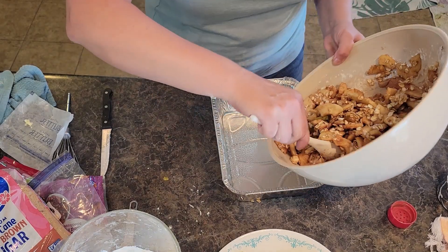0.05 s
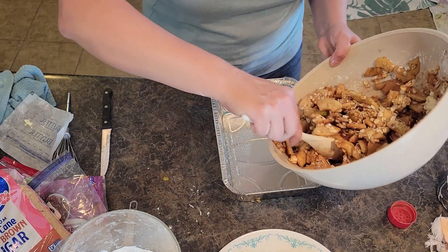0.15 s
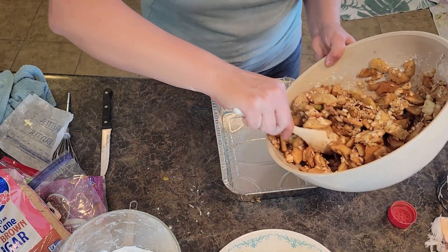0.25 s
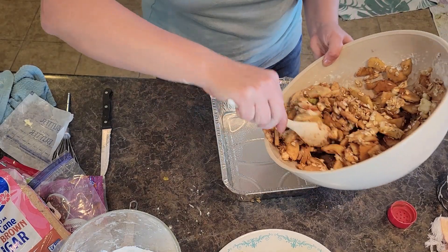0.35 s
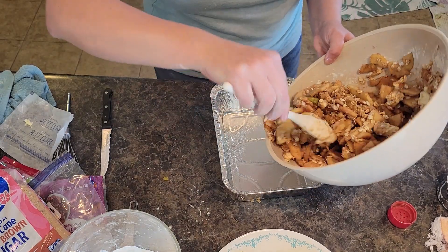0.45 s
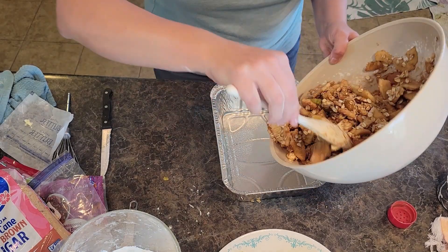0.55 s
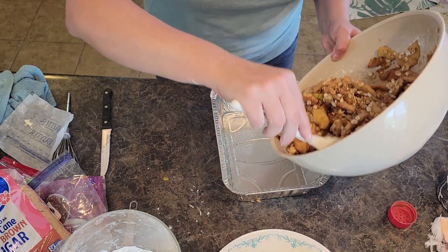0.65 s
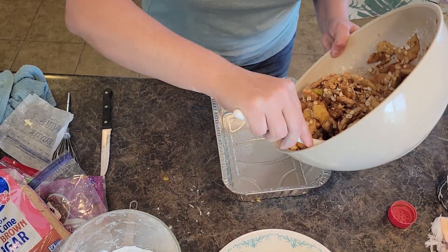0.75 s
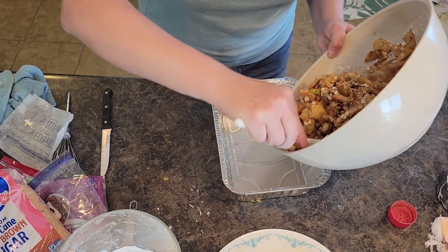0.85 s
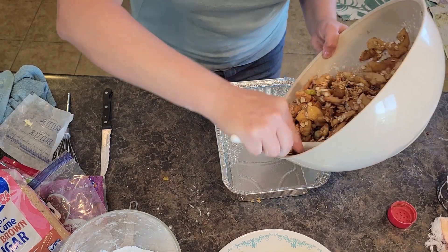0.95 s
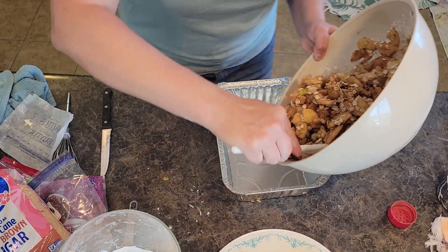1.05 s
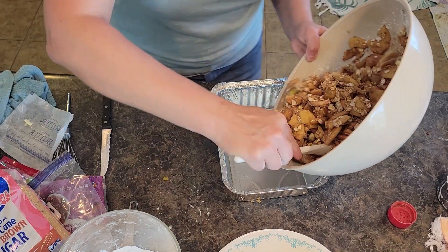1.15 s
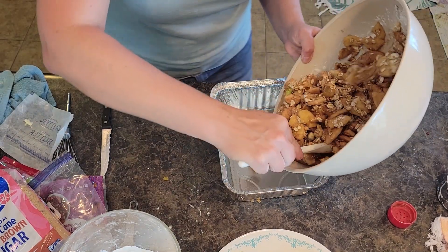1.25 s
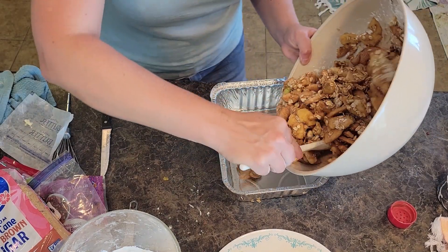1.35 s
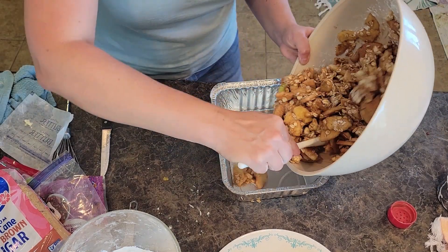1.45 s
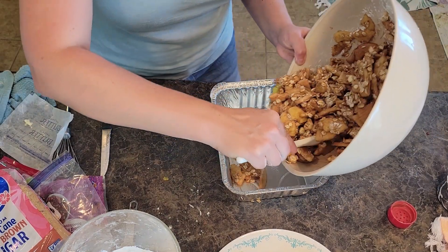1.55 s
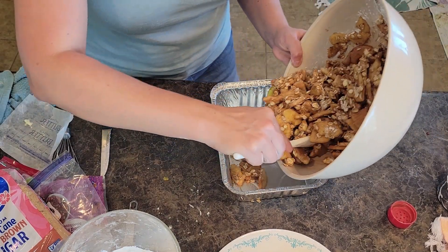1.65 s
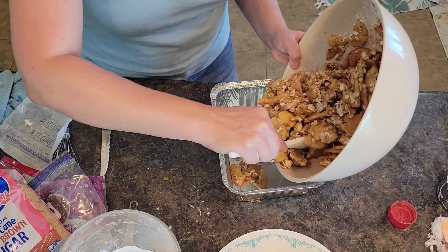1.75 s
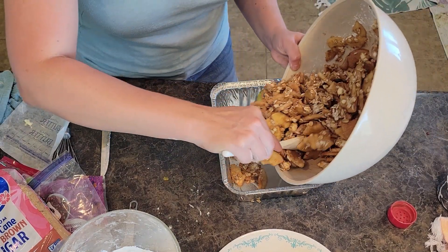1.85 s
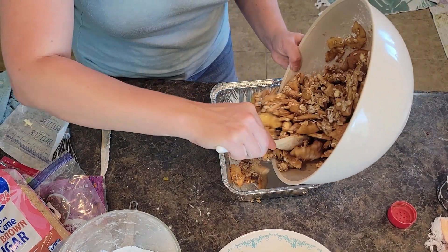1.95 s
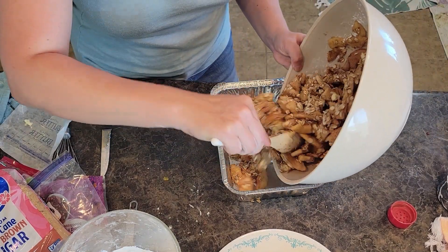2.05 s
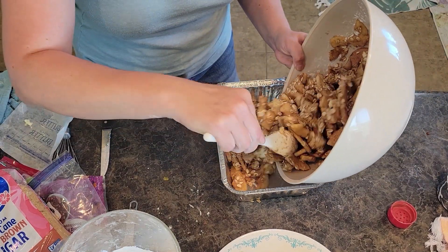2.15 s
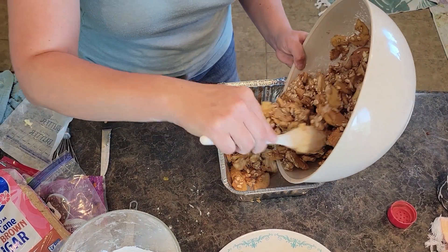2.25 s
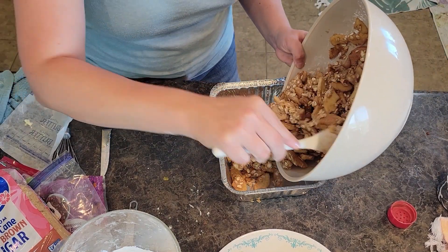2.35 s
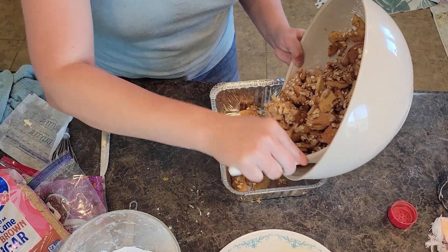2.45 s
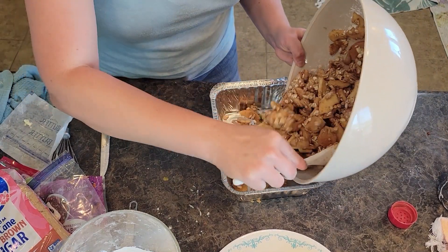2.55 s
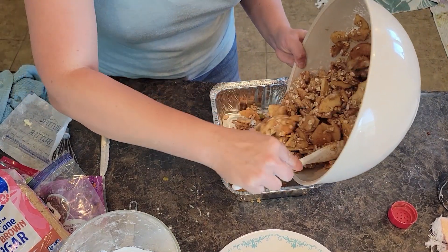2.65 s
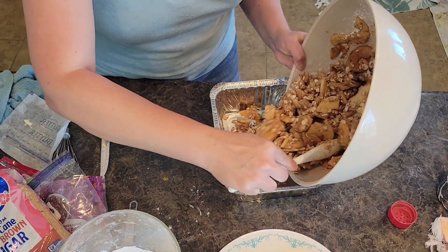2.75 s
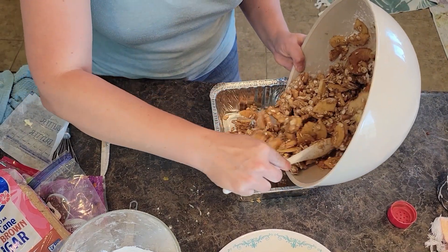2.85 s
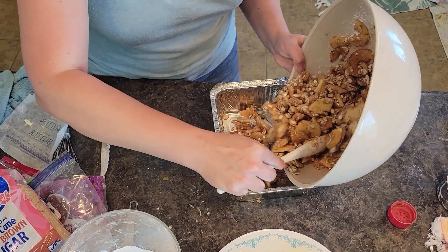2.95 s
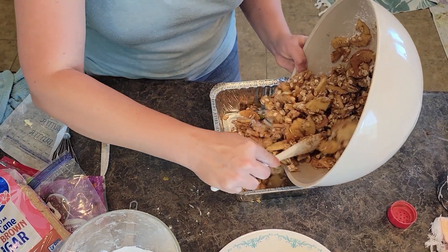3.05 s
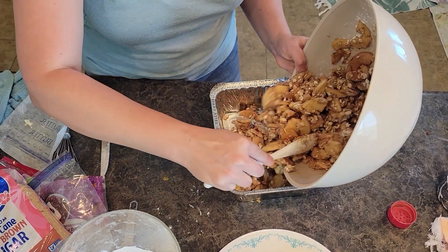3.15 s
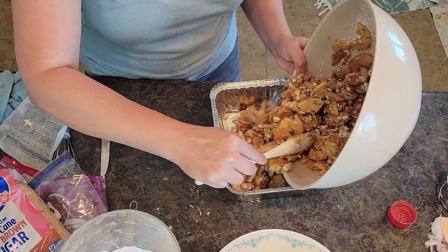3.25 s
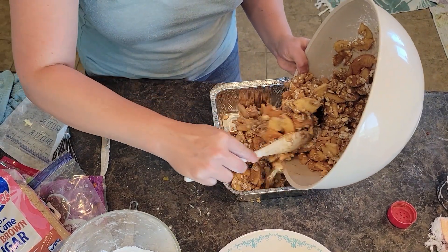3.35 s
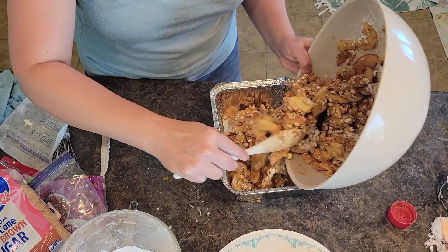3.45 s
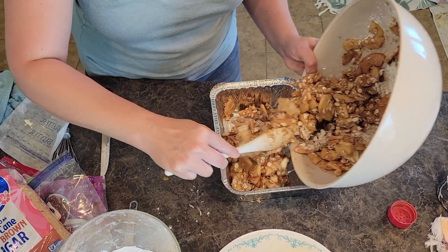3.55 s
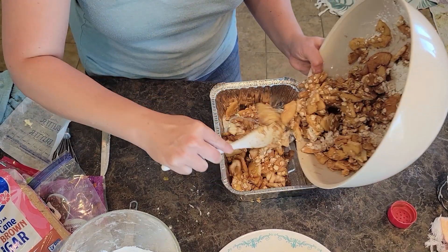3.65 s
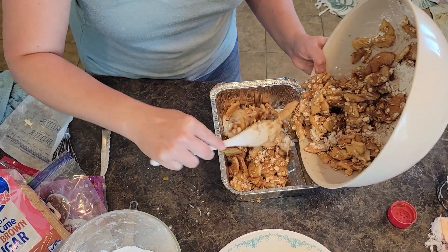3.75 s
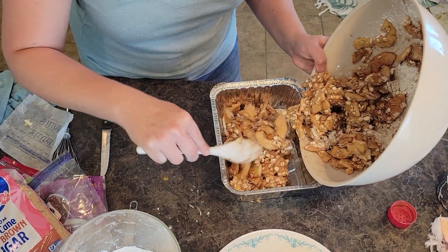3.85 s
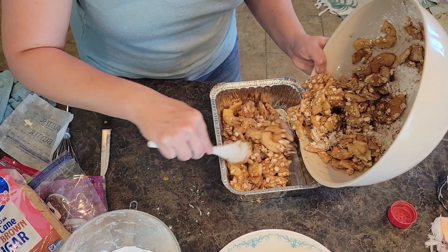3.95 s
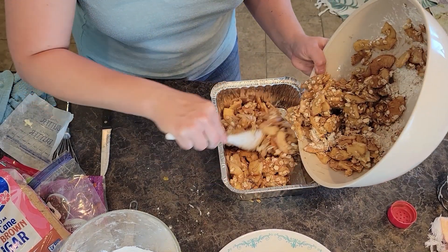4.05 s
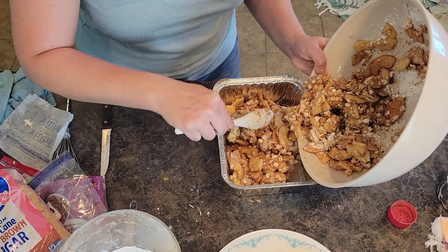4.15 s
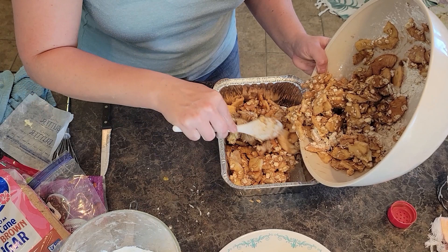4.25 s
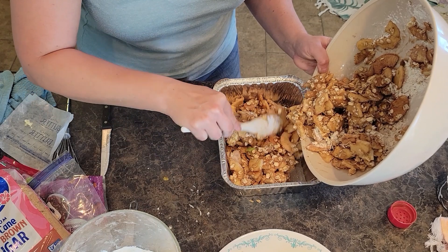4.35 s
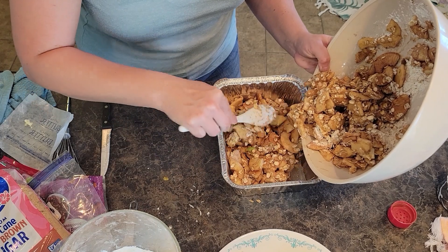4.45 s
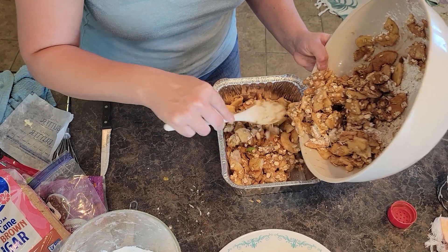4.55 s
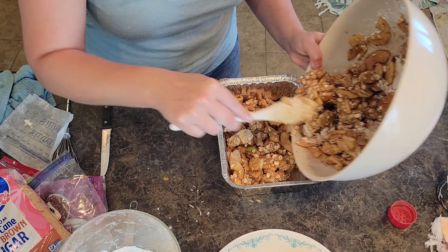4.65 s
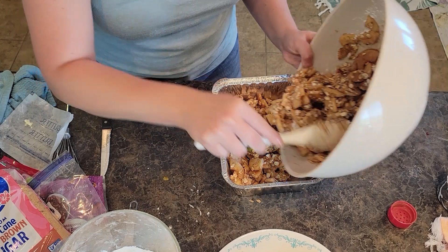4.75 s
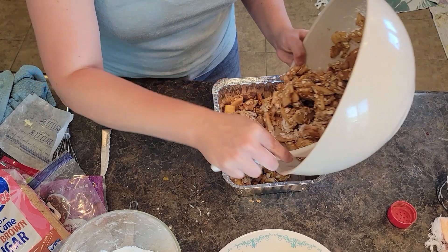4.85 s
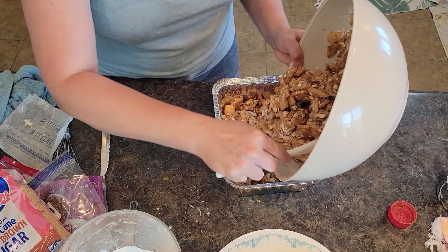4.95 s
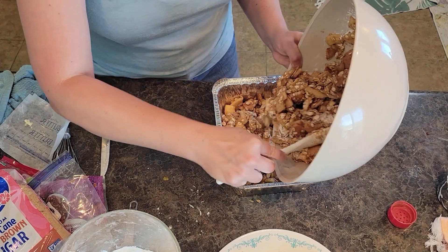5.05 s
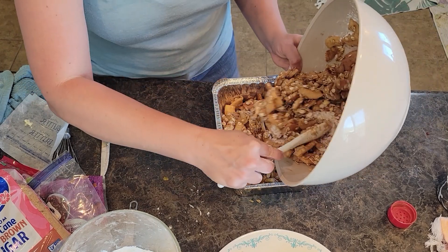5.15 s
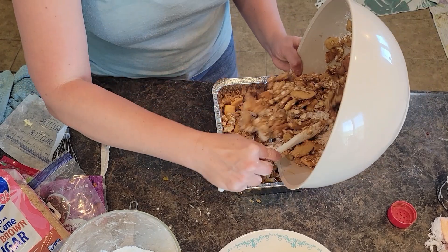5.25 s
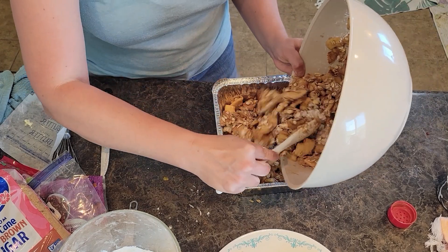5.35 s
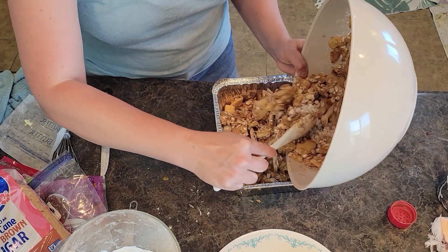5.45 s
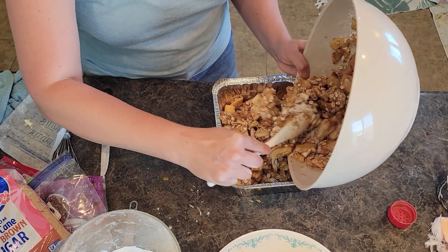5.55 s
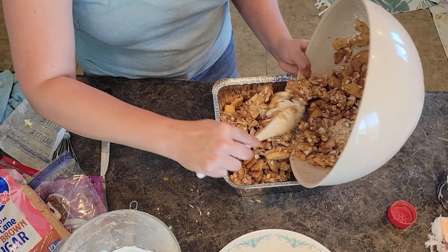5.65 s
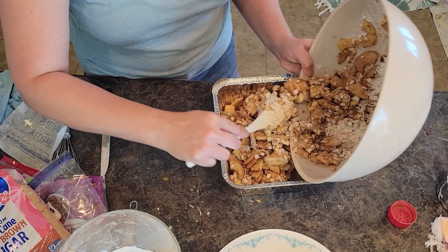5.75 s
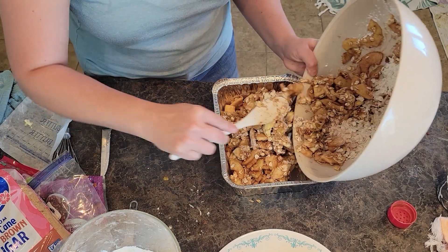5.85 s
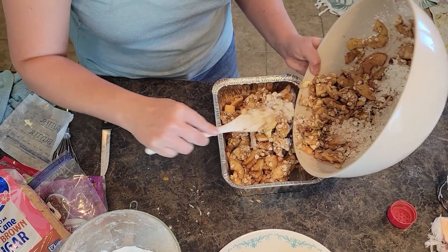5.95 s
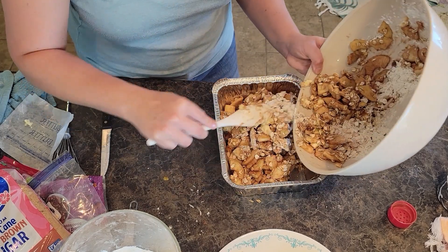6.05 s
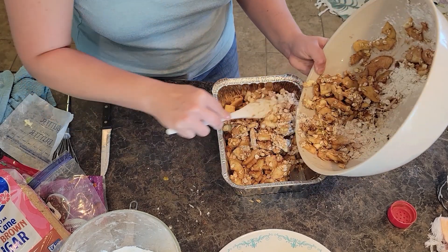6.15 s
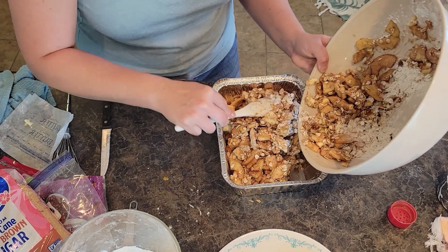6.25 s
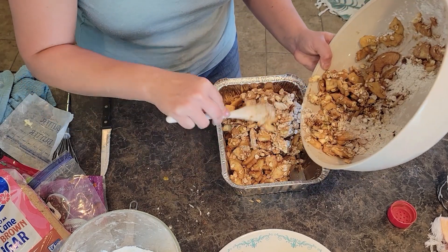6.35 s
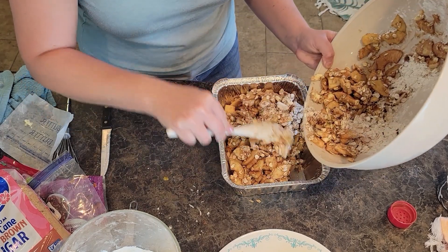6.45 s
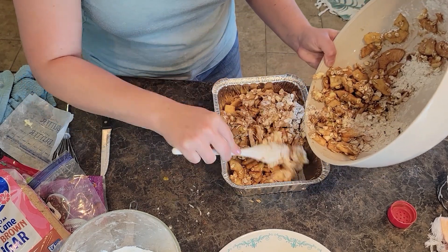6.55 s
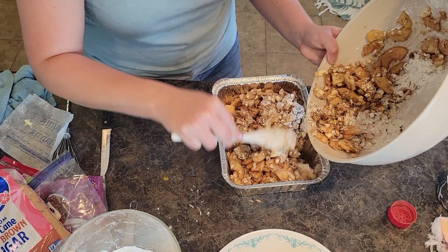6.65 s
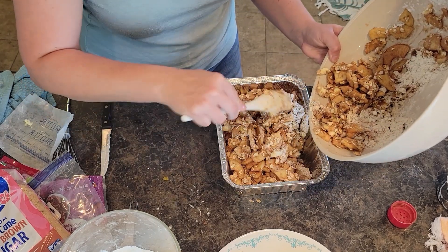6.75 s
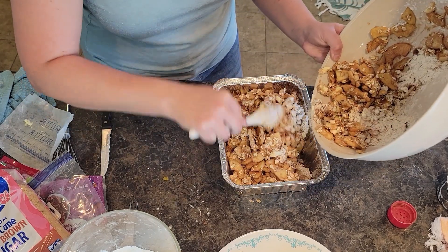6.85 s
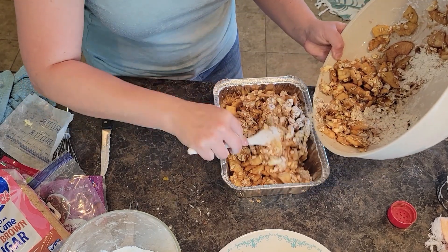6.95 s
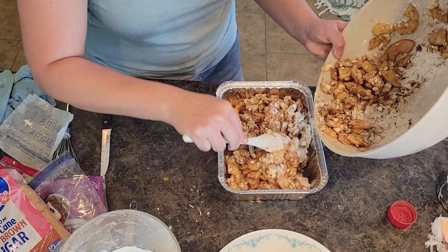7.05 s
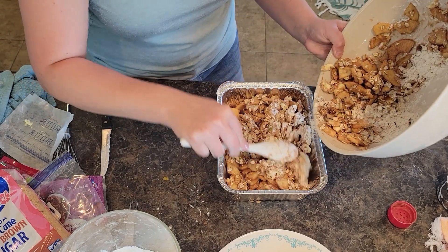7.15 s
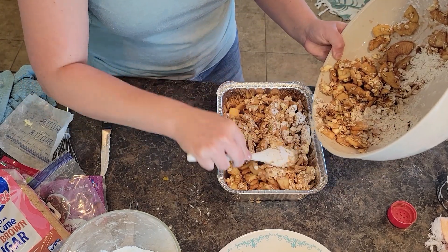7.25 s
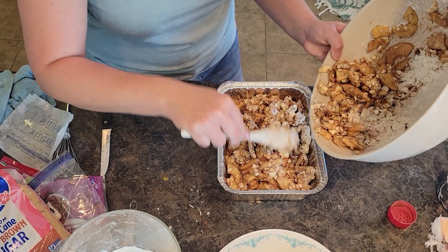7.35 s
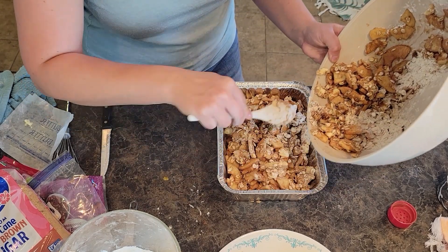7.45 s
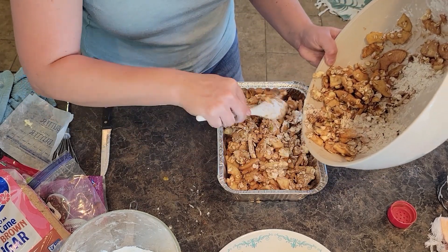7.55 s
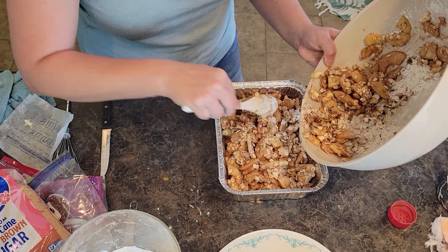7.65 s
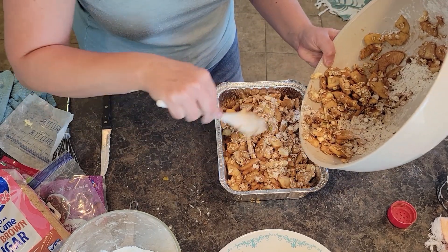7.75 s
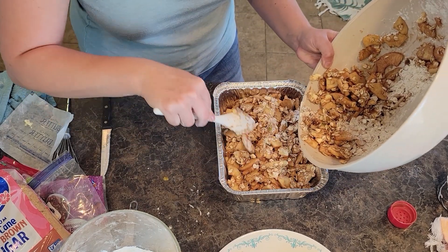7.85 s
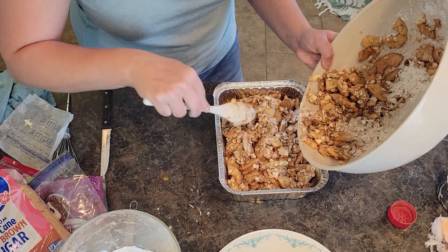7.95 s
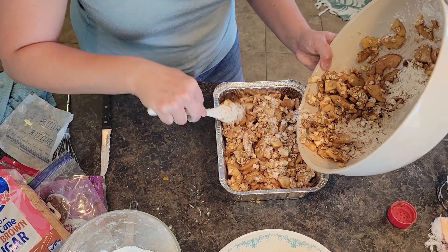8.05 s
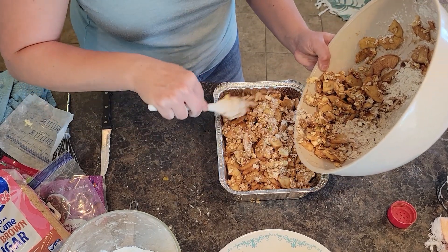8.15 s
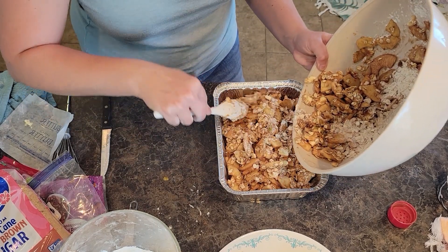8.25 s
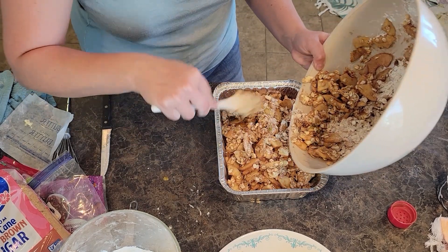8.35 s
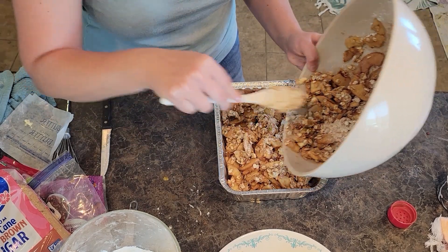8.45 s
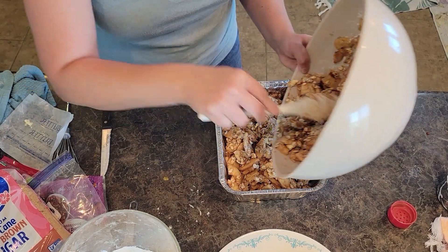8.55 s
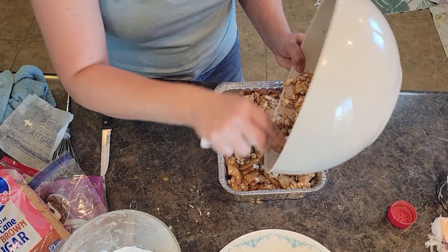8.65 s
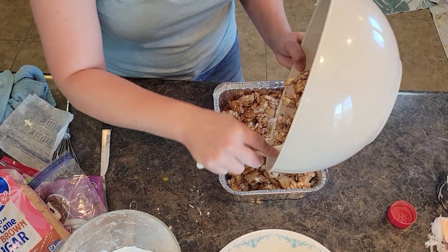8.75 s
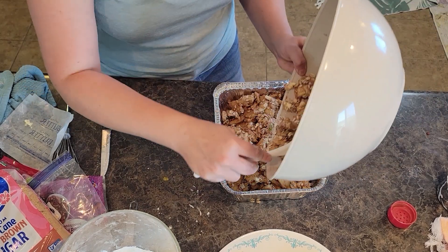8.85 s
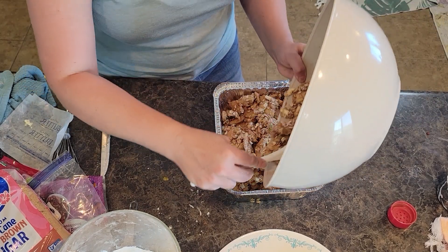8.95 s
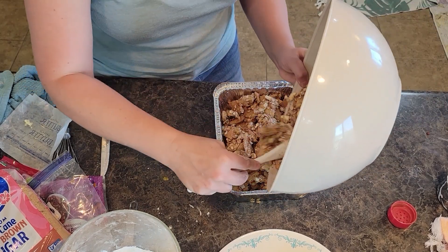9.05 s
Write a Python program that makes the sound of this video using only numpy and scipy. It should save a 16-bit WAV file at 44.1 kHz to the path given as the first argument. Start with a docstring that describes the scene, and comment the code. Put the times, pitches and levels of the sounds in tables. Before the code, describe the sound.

A small hard-surfaced kitchen, heard closely in stereo, with a steady faint low hum and barely audible moist crackle. In the first second there are only soft low bumps, a faint rub and a light spoon tap at 0.7. From 1.3 to 1.65 the plastic bowl knocks the foil tin: hollow thuds, crackles and soft plops. A dense clatter runs from 2.05 to 2.5, with one hard, loudest clack at 2.07 and crumbs ticking down. Light taps cluster around 3.1, then 3.6 to 4.3 with dull lumps landing, scraping and a low tin knock. Rubs and taps follow at 4.9; a quiet spell after 5.1 holds sparse ticks and a very faint thin high whistle. From 5.7 to 7.7, irregular taps, gritty strokes and foil snaps return, strongest near 6.8 and 7.3. Small taps at 8.1 give way to faint rubbing until about 9.1.

```python
"""A spoon scoops a sticky, crumbly fruit mixture from a big plastic bowl into a foil tin on a kitchen counter.
Taps, knocks of the bowl's rim and foil crackle are noise bursts plus dying modes; plops are low noise pushes.
Strokes and spills are grains and ticks; rubs, and one faint high whistle, are resonated noise.
A small hard room echoes the work over a steady low hum of air.
Event levels in the tables stand before the layer gains in scene(), the echoes and the microphones."""
import sys
import numpy as np
from scipy import signal
from scipy.fft import rfft, irfft
from scipy.io import wavfile
from scipy.ndimage import uniform_filter1d

SR = 44100
rng = np.random.default_rng(int(sys.argv[2]) if len(sys.argv) > 2 else 0)


def dump_mix(stems):
    """Bounce the given channels to the path in sys.argv[1] as a 16-bit WAV at rate SR."""
    frames = np.atleast_2d(stems).T  # one column per channel
    limited = np.clip(frames, -1, 1)  # hard clip at full scale
    pcm = np.round(limited * 32767).astype(np.int16)
    wavfile.write(sys.argv[1], SR, pcm)


N = 401118
BLOW_SAMPLES = 882  # opening over which a blow's level counts
RING_S = np.arange(8192) / SR  # time axis of one blow

# modes of the loaded tin's floor: mode_hz, level_db, t60_s
TIN_MODES = [(368, -16.5, 0.74), (497, 3.5, 0.11), (570, -0.5, 0.17), (633, 4, 0.12), (711, -2.5, 0.25),
             (787, -4, 0.14), (844, -1, 0.29), (1037, 3.5, 0.093)]
# foil crackle spectrum: freq_hz, density_db_per_hz
FOIL_SPECTRUM = [(500, -64), (1700, -11.5), (2400, 1.5), (3100, 4.5), (4500, -3), (6000, -4.5), (8000, -14),
                 (11000, -23), (15000, -22.5)]
# crumb and scrape spectrum: freq_hz, density_db_per_hz
CRUMB_SPECTRUM = [(150, -28), (500, -12.5), (900, 6), (1700, 0.5), (2400, -1), (3300, -1), (6000, -6),
                  (8000, -10.5), (11000, -15), (15000, -15)]


def amp(db):
    """Decibels to gain."""
    return 10 ** (np.asarray(db) / 20)


def evened(x):
    """Scales to rms 1."""
    return x / np.sqrt(np.mean(x ** 2) + 1e-20)


def at_level(x, db):
    """Scales a blow so that its opening has this rms level."""
    opening = x[..., :BLOW_SAMPLES]
    return amp(db) * x / np.sqrt(np.mean(opening ** 2) + 1e-20)


def read(points, hz):
    """Joins points by straight lines over log frequency."""
    point_hz, value = np.transpose(points)
    return np.interp(np.log(hz + 1), np.log(point_hz + 1), value)


def add(mix, start_s, sound):
    """Mixes a sound in at start_s."""
    part = mix[:, max(round(start_s * SR), 0):][:, :sound.shape[-1]]
    part += sound[..., :part.shape[1]]


def colour(x, points, tilt=0, size=2048, top_hz=9000):
    """Minimum-phase filter with this spectrum, tilted in dB per octave from the third point up to top_hz."""
    hz = np.fft.rfftfreq(size, 1 / SR)
    tilt_db = tilt * np.log2(np.clip(hz, points[2][0], top_hz))
    log_gain = np.log(amp(read(points, hz) + tilt_db))
    circle = np.r_[log_gain, log_gain[-2:0:-1]]
    kernel = np.fft.ifft(np.exp(np.conj(signal.hilbert(circle)))).real
    return signal.fftconvolve(x, kernel[None], axes=1)[:, :x.shape[1]]


def hump(hz, centre_hz, sharpness):
    """Gain of a broad resonance."""
    return 1 / np.sqrt(1 + (sharpness * (hz / centre_hz - centre_hz / hz)) ** 2)


def band(x, centre_hz, octaves):
    """Causal band-pass around a centre."""
    edges_hz = centre_hz * 2. ** (np.array([-.5, .5]) * octaves)
    edges_hz = np.clip(edges_hz, 10, SR / 2 - 10)
    return signal.sosfilt(signal.butter(2, edges_hz, "bandpass", fs=SR, output="sos"), x)


def resonate(x, hz, width_hz):
    """A resonance that follows the pitch curve hz."""
    turn = np.exp(2j * np.pi * np.cumsum(hz) / SR)
    pole = np.exp(-np.pi * width_hz / SR)
    return 2 * (turn * signal.lfilter([1 - pole], [1, -pole], x / turn)).real


def pair(three, same):
    """One shared and two separate signals become two partly alike channels."""
    same = np.clip(same, 0, 1)
    return np.sqrt(same) * three[0] + np.sqrt(1 - same) * three[1:]


def air():
    """Steady low rush of the room: shaped noise, nearly alike at both ears in the bass."""
    # spectrum: freq_hz, density_db_per_hz
    air_spectrum = [(15, -76), (25, -24), (53, -12.5), (70, -0.5), (130, -1.5), (180, -10), (200, -15.5),
                    (242, -7), (416, -9.5), (1290, -23), (3620, -28), (4140, -32.5), (5730, -33.5),
                    (16000, -51)]
    # left-right likeness: freq_hz, shared_power_fraction
    likeness = [(60, 0.9), (150, 0.94), (300, 0.61), (600, 0.017), (12000, 0.021)]
    hz = np.fft.rfftfreq(N, 1 / SR)
    noise = pair(rfft(rng.standard_normal((3, N))), read(likeness, hz))
    rush = evened(irfft(noise * amp(read(air_spectrum, hz)), N))
    return amp(-58) * rush * amp([[-.8], [.8]])  # right channel louder


def grains(count, per_s, spread_db):
    """Sparse clicks of very unequal size."""
    size_db = spread_db * np.minimum(rng.exponential(1, (3, count)), 4)
    size = amp(size_db) * rng.choice([-1, 1], (3, count))
    return pair(size * (rng.random((3, count)) < per_s / SR), same=0.22)


def wet_crackle():
    """The wet mixture crackles very faintly throughout."""
    ticks = grains(N, per_s=40, spread_db=3)
    return amp(-82) * evened(colour(ticks, CRUMB_SPECTRUM, tilt=-3.0))


def crumple(seconds, same, rise_s=0.0007, spikiness=1.1, clump_db=4.0):
    """The force of one contact: it builds through a film of food, then dies in uneven runs of tiny slips."""
    slips = rng.standard_normal((3, len(RING_S)))
    runs = amp(clump_db * evened(uniform_filter1d(rng.standard_normal(len(RING_S)), size=70)))
    shape = building(rise_s) ** 2 * np.exp(-RING_S / max(seconds, 1e-4))
    return pair(slips * np.abs(slips) ** spikiness, same) * shape * runs


def building(rise_s):
    """Envelope that climbs smoothly towards 1 with this time constant."""
    return 1 - np.exp(-RING_S / max(rise_s, 1e-5))


def spills():
    """Pieces of fruit and crumb fall one by one, each a tiny dry tick at its own pitch."""
    # loose pieces tumble: start_s, length_s, mean_piece_level_db, pieces_per_s
    spill_events = [(0.049, 0.089, -72, 30), (0.853, 0.11, -58, 45), (2.09, 0.15, -43.5, 80),
                    (3.635, 0.17, -61, 45), (5.1, 0.42, -62, 20), (7.273, 0.066, -60, 70)]
    low_hz, high_hz = 1230, 3970
    out = np.zeros((2, N))
    for start_s, length_s, level_db, per_s in spill_events:
        count = max(round(length_s * per_s), 1)
        for k, (late, size, pitch) in enumerate(rng.random((count, 3))):
            hz = low_hz * (high_hz / low_hz) ** pitch
            tick = band(crumple(0.002, same=.5), hz, octaves=1)
            piece_s = start_s + length_s * (k + late) / count
            add(out, piece_s, at_level(tick, level_db + 10 * (size - .5)))
    return out


def ring(modes, weight=1, damping=1, scatter_db=3.5, detune=0.031, spread=0.75):
    """Dying modes; each contact point weighs them anew, with a small phase offset between the ears."""
    hz, db, t60_s = np.transpose(modes)
    size, shift, side, sign = rng.standard_normal((4, len(hz)))
    gain = amp(db + scatter_db * size) * weight * np.sign(sign)
    rate = 2j * np.pi * hz * (1 + detune * shift) - np.log(1000) * damping / t60_s
    waves = np.exp(np.outer(rate, RING_S))
    ear_phase = np.exp(1j * spread * np.outer([1, -1], side))
    return ((gain * ear_phase) @ waves).imag


def thud():
    """The heavy counter takes a moment to answer a blow."""
    # counter modes: mode_hz, level_db, t60_s
    counter_modes = [(87.5, -11, 0.15), (124, -4, 0.048), (175.4, 0.5, 0.066), (203, -2, 0.072),
                     (256, 5, 0.065), (274.4, -7.5, 0.18), (371, 0, 0.11)]
    return ring(counter_modes, spread=0.87) * building(0.0013)


def ping(hz, t60_s, rise_s):
    """One short note, sinking as the pressure eases, slightly out of step at the two ears."""
    sag = 0.14  # pitch range as a share, centred on hz
    phase = .3 * rng.standard_normal((2, 1))
    fade = np.exp(-np.log(1000) * RING_S / t60_s)
    turns = np.cumsum(hz * (1 + sag * (fade - .5))) / SR
    return np.sin(2 * np.pi * turns + phase) * fade * building(rise_s)


def clack(hz, seconds, dead_db=0):
    """Plastic meets something hard: a dead knock plus the short modes nearest its pitch."""
    # spoon and bowl modes: mode_hz, level_db, t60_s
    bowl_modes = [(945, 6, 0.02), (1053, 6.5, 0.02), (1290, 6, 0.025), (1389, 8, 0.033), (1563, 5, 0.033),
                  (1760, 8, 0.017), (2300, -3, 0.03)]
    weight = hump(np.array(bowl_modes)[:, 0], hz, sharpness=7.6)
    modes = ring(bowl_modes, weight, detune=0.027) * building(0.00025)
    dead_knock = band(crumple(seconds, same=0.98), hz, octaves=0.94)
    return at_level(modes, 0) + at_level(dead_knock, dead_db)


def crackle(seconds, tilt, wall_db):
    """Foil buckles in a spray of separate snaps, and its walls ring briefly."""
    # foil wall modes: mode_hz, level_db, t60_s
    wall_modes = [(2770, -2, .03), (3071, 0, .04), (3399, 0, .04), (3680, -1, .03), (4050, -4, .02),
                  (5600, -5, .012)]
    walls = ring(wall_modes, scatter_db=2, detune=.006, spread=.8)
    snaps = crumple(seconds, same=.17, rise_s=.0011, spikiness=1.3)
    return at_level(colour(snaps, FOIL_SPECTRUM, tilt), 0) + at_level(walls, wall_db)


def taps():
    """The spoon's light blows on bowl or rim: a quick hard note, with tin floor, walls and counter answering."""
    # start_s, level_db, pitch_hz, foil_rel_level_db
    tap_events = [(0.463, -56.5, 1920, -13), (0.7407, -46, 1704, -6.5), (1.522, -39, 1360, -12),
                  (2.0702, -19.5, 1360, -11.5), (2.113, -32.5, 1500, -28), (2.265, -39.5, 1340, -17),
                  (2.5061, -42, 1650, -13.5), (2.917, -53.5, 1850, -8), (2.998, -60, 1300, 7.5),
                  (3.072, -34.5, 1450, -19), (3.093, -43, 1280, -8), (3.16, -42, 1640, -24),
                  (3.183, -51, 1510, -5), (3.629, -39.5, 1390, -22), (3.668, -40, 1240, -17),
                  (3.7415, -38.5, 1390, -16), (3.885, -46.5, 1200, 2), (3.905, -43.5, 1260, 9),
                  (4.077, -48, 1310, -0.5), (4.2567, -44, 1230, -28), (4.567, -75.5, 1880, 23),
                  (4.621, -62.5, 1380, 14), (4.871, -42, 1570, -18), (4.921, -42.5, 1820, -2),
                  (5.739, -45, 1180, -1), (5.952, -40.5, 1220, -18), (6.02, -48.5, 2290, 2.5),
                  (6.04, -45, 1370, -29), (6.097, -51.5, 1250, 9), (6.2541, -46.5, 1380, 5.5),
                  (6.6943, -44, 1400, 0), (6.7301, -51, 1470, 7.5), (6.7837, -38.5, 1640, -27),
                  (6.962, -44, 1320, -3.5), (7.089, -46, 1460, 2), (7.224, -45.5, 1400, -22),
                  (7.2647, -36.5, 1440, -5.5), (7.617, -44, 910, -14), (7.6378, -42, 1540, 7),
                  (8.11, -50.5, 1160, -3.5), (8.14, -46, 1660, -9.5), (8.325, -66.5, 1200, 0),
                  (8.362, -57, 1470, -7.5), (8.792, -59, 2540, -6), (9.084, -57, 1930, -11)]
    clack_s, crackle_s = 0.0089, 0.0038  # decay time constants
    out = np.zeros((2, N))
    for start_s, level_db, hz, foil_rel_db in tap_events:
        # a light catch of foil snaps bright, a deep one is fuller
        brightness_db_per_octave = 6.1 - 0.28 * foil_rel_db
        # the spoon pressing on the food damps the tin's floor
        floor = ring(TIN_MODES, damping=4.5) * building(0.0034)
        sound = at_level(floor, level_db - 7) + at_level(thud(), level_db - 13.5)
        # food on the spoon stops the note quickly
        note = ping(hz, t60_s=0.015, rise_s=0.00039)
        contact = at_level(note, 0) + at_level(clack(hz, clack_s), 2)
        sound += at_level(contact, level_db)
        sound += at_level(crackle(clack_s, tilt=-20.5, wall_db=-26.0), level_db - 13.5)
        foil = crackle(crackle_s, brightness_db_per_octave, wall_db=-4.5)
        sound += at_level(foil, level_db + foil_rel_db)
        add(out, start_s, sound)
    return out


def plops():
    """A soft mass spreads its push over time, so only low notes sound, the counter's among them."""
    # lumps land, things bump dully: start_s, level_db, centre_hz
    plop_events = [(0.515, -48.5, 59), (0.646, -52, 124), (1.339, -41, 560), (1.524, -37.5, 515),
                   (3.355, -53, 237), (3.502, -52, 222), (3.674, -43, 273), (3.949, -39.5, 577),
                   (3.963, -39, 580), (4.078, -45, 254), (5.394, -42.5, 500), (6.096, -52.5, 314),
                   (6.69, -50.5, 176), (7.612, -50.5, 383)]
    settle_s, settle_ref_db, halving_db = 0.035, -57.5, 34  # faster, louder lumps stop sooner
    out = np.zeros((2, N))
    for start_s, level_db, hz in plop_events:
        seconds = settle_s * 2 ** ((settle_ref_db - level_db) / halving_db)
        age = RING_S / seconds
        noise = pair(rng.standard_normal((3, len(RING_S))), same=0.81)
        push = noise * age ** 0.19 * np.exp(-age ** 2)
        sound = band(push, hz, octaves=1.0)
        # total energy as if held at level_db for the settling time
        sound *= amp(level_db) * np.sqrt(2 * seconds * SR / np.sum(sound ** 2))
        add(out, start_s, sound + at_level(thud(), level_db - 5))
    return out


def stroke(seconds, per_s, spread_db, clump_db):
    """Grains under one sweep of the spoon; they come in clumps as it catches and slips."""
    count = int(seconds * SR)
    clumps = evened(uniform_filter1d(rng.standard_normal(count), size=300))
    sweep = np.abs(np.sin(np.linspace(0, np.pi, count)))
    return grains(count, per_s, spread_db) * amp(clump_db * clumps) * sweep


def rubs():
    """The spoon rubs a wall, which sings with it: slips drive a resonance that drifts as the spoon travels."""
    # start_s, length_s, level_db, pitch_hz
    rub_events = [(0.802, 0.18, -61.5, 1800), (2.513, 0.099, -59, 1670), (4.474, 0.016, -58, 5100),
                  (4.852, 0.12, -53, 1830), (4.95, 0.096, -65, 1860), (7.874, 0.032, -56.5, 3900),
                  (8.754, 0.13, -61, 1880), (8.867, 0.29, -69.5, 1930)]
    drift_share, width_share = 0.07, 0.36  # rms pitch drift; bandwidth over pitch at 1800 Hz
    out = np.zeros((2, N))
    for start_s, length_s, level_db, hz in rub_events:
        slips = stroke(length_s, per_s=600, spread_db=4.5, clump_db=5)
        drift = evened(uniform_filter1d(rng.standard_normal(slips.shape[1]), size=1500))
        # higher notes are damped more, so wider
        width_hz = width_share * hz * (hz / 1800) ** 4.4
        note = resonate(band(slips, hz, octaves=1.16), hz * (1 + drift_share * drift), width_hz)
        wall = evened(note) + amp(-6) * evened(colour(slips, FOIL_SPECTRUM))
        grit = amp(-10.0) * evened(colour(slips, CRUMB_SPECTRUM, tilt=11.0))
        add(out, start_s, amp(level_db) * evened(wall + grit))
    return out


def strokes():
    """The spoon drags through sugary crumbs and along the foil, crushing grains."""
    # start_s, length_s, level_db
    stroke_events = [(0.857, 0.072, -64), (3.334, 0.029, -56), (4.092, 0.13, -50.5), (4.38, 0.11, -64.5),
                     (4.86, 0.051, -67), (5.73, 0.044, -55), (6.201, 0.1, -57), (6.681, 0.092, -54.5),
                     (6.926, 0.1, -54), (6.989, 0.15, -51), (7.225, 0.045, -58), (7.55, 0.051, -66.5),
                     (7.646, 0.088, -59), (8.09, 0.061, -60), (8.779, 0.08, -64.5)]
    out = np.zeros((2, N))
    for start_s, length_s, level_db in stroke_events:
        crumbs = stroke(length_s, per_s=2200, spread_db=4.8, clump_db=3)
        add(out, start_s, amp(level_db) * evened(colour(crumbs, CRUMB_SPECTRUM, tilt=0.99)))
    return out


def knocks():
    """The bowl shoves the tin: the counter thuds, the tin's floor rings, the rim clacks, the foil crackles."""
    # start_s, level_db, foil_rel_level_db, brightness_db_per_octave, leading_note_hz, thud_rel_level_db
    knock_events = [(1.335, -30.5, -4, 7.5, 536, -2), (1.413, -42.5, 9.5, 2.5, 714, -4),
                    (1.422, -36, -5, 1, 690, -6), (1.455, -35.5, -9, -16, 595, -3),
                    (1.516, -36.5, -6.5, 5, 494, -7.5), (1.522, -32.5, -9, -4, 493, -8.5),
                    (1.6335, -42, 6.5, -0.5, 606, -3.5), (1.833, -49, 9.5, 7, 497, 11),
                    (1.851, -41, 3, 0.5, 560, -8.5), (2.0485, -37, 1.5, 4.5, 595, -3),
                    (2.061, -36.5, 4, -1, 630, 1), (2.0713, -33, 1, 2.5, 630, -17),
                    (2.0805, -30.5, -10, 5, 624, -16), (2.113, -37, -4, -14, 635, -5),
                    (2.1553, -37.5, -3, 6.5, 593, -2), (2.1855, -37, 0.5, 3.5, 610, 1),
                    (2.207, -39.5, -8, -6, 593, 1), (2.2719, -38.5, 3, 5, 550, -3.5),
                    (2.304, -41, -17, 2, 530, 1), (2.323, -43.5, -35, 3, 485, 5.5),
                    (2.401, -35.5, -12, 11, 510, -7), (3.0461, -38.5, -18, 10, 626, -4.5),
                    (3.3554, -55.5, 18.5, 10.5, 494, 7), (4.109, -49, 10, 7.5, 505, -7),
                    (4.2566, -35.5, -35, 16, 495, -7.5), (7.266, -51, 0.5, -14, 503, -18),
                    (7.6364, -54, 16, 9, 636, -13)]
    crumple_s, halving_db_per_octave = 0.0077, 13  # bright contacts are short
    out = np.zeros((2, N))
    for start_s, level_db, foil_rel_db, brightness, hz, thud_rel_db in knock_events:
        seconds = crumple_s * 2 ** (-brightness / halving_db_per_octave)
        crackle_db = level_db + foil_rel_db
        # where the rim presses decides which floor note leads
        weight = hump(np.array(TIN_MODES)[:, 0], hz, sharpness=6.4)
        modes = ring(TIN_MODES, weight, scatter_db=5.0, detune=0.0087) * building(0.0011)
        press = band(crumple(0.016, same=0.39), hz, octaves=1.0)
        floor = at_level(modes, 0) + at_level(press, -10)
        sound = at_level(thud(), level_db + thud_rel_db) + at_level(floor, level_db)
        sound += at_level(clack(1275, seconds, dead_db=-5.0), level_db - 5)
        sound += at_level(crackle(seconds, brightness, wall_db=-26.5), crackle_db)
        # crumbs shaken loose patter on the foil
        patter = grains(len(RING_S), per_s=540, spread_db=4) * np.exp(-RING_S / 0.044)
        crumbs = colour(patter, CRUMB_SPECTRUM)
        add(out, start_s, sound + at_level(crumbs, crackle_db - 11))
    return out


def pitched_bursts():
    """Short narrow-band bursts at their own pitch that colour some taps and knocks, many like popping foil."""
    # start_s, level_db, pitch_hz
    burst_events = [(1.416, -44, 2820), (1.635, -41, 3570), (2.401, -45.5, 3030), (3.075, -48, 3000),
                    (6.694, -52, 3050), (6.783, -51, 3300), (6.7835, -46, 2190), (6.784, -45.5, 1034),
                    (7.266, -44.5, 900), (7.266, -48, 3320), (7.638, -43, 2570)]
    out = np.zeros((2, N))
    for start_s, level_db, hz in burst_events:
        burst = band(crumple(0.0048, same=0.73), hz, octaves=0.24)
        add(out, start_s, at_level(burst, level_db))
    return out


def whistle():
    """A faint, thin, fuzzy high whistle: resonated noise; pitch and level rise and fall in one arch."""
    # start_s, length_s, level_db, end_pitch_hz, top_pitch_hz
    whistle_event = (5.12, 0.55, -82, 7850, 8530)
    start_s, length_s, level_db, end_hz, top_hz = whistle_event
    arch = np.sin(np.linspace(0, np.pi, int(length_s * SR)))
    hz = end_hz + (top_hz - end_hz) * arch ** 2
    noise = rng.standard_normal((2, len(arch)))
    tone = resonate(resonate(noise, hz, 480), hz, 480)
    out = np.zeros((2, N))
    add(out, start_s, amp(level_db) * evened(tone * np.sqrt(arch)))
    return out


def kitchen(x, tail_db, early_db, count=8):
    """A few reflections from counter and cupboards, then a diffuse tail dying band by band."""
    # room decay: freq_hz, t60_s
    room_decay = [(150, 0.5), (500, 0.52), (1400, 0.38), (3700, 0.37), (14000, 0.3)]
    size = SR // 2
    hz, t, z = signal.stft(rng.standard_normal((2, size)), SR, nperseg=256)
    decay = amp(-60 * t / read(room_decay, hz)[:, None])
    tail = signal.istft(z * decay, SR, nperseg=256)[1][:, :size]
    tail *= 1 - np.exp(-(np.arange(size) / SR / 0.0047) ** 2)
    early = np.zeros((2, size))
    delays = (rng.uniform(.002, .022, (2, count)) * SR).astype(int)
    np.put_along_axis(early, delays, rng.choice([-1., 1.], delays.shape) / np.sqrt(count), 1)
    echoes = amp(tail_db) * tail / np.linalg.norm(tail[0]) + amp(early_db) * early
    return x + signal.fftconvolve(x, echoes, axes=1)[:, :N]


def microphones(x, low_cut_hz=48):
    """Two close microphones: side level varies with pitch, the right leads by one sample, deep bass is cut."""
    # channel difference: freq_hz, side_gain_db
    side_width = [(60, -9), (170, -18), (320, -3), (500, 1.5), (1200, 2), (5000, -1.3), (12000, -1.5)]
    # right mostly louder: freq_hz, left_minus_right_db
    side_lean = [(130, -1), (260, -2), (520, 0), (1000, -2), (4000, -1.5), (10000, -0.5)]
    hz = np.fft.rfftfreq(N, 1 / SR)
    mid = rfft(x[0] + x[1]) / 2
    side = rfft(x[0] - x[1]) / 2 * amp(read(side_width, hz))
    lean = amp(read(side_lean, hz) / 2)
    left = (mid + side) * lean * np.exp(-2j * np.pi * hz / SR)
    right = (mid - side) / lean
    both = irfft(np.array([left, right]), N)
    return signal.sosfilt(signal.butter(4, low_cut_hz, "highpass", fs=SR, output="sos"), both)


def scene():
    """All the work, a little to the right of centre, echoes in the kitchen over the air."""
    light = taps() + spills()
    faint = wet_crackle() + rubs() + strokes() + whistle()
    work = amp(-5.5) * kitchen(light, tail_db=-6.0, early_db=-6.5)
    work += kitchen(plops(), tail_db=-3.5, early_db=-12.5)
    work += amp(-1.0) * kitchen(faint, tail_db=-4.5, early_db=0.0)
    work += amp(-1.06) * kitchen(knocks() + pitched_bursts(), tail_db=-6.5, early_db=-7.0)
    return microphones(work) + air()


def record(dry):
    """The recorder's band limit: a linear-phase low-pass."""
    edge_hz = 16200
    low_pass = signal.firwin(511, edge_hz, window=("kaiser", 9), fs=SR)
    return signal.oaconvolve(dry, low_pass[None], "same")


dry = scene()
out = record(dry)
dump_mix(out)
```